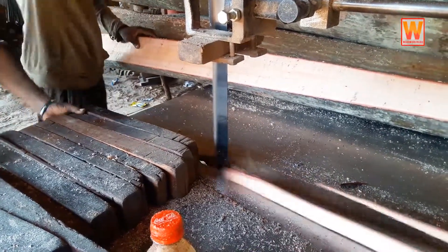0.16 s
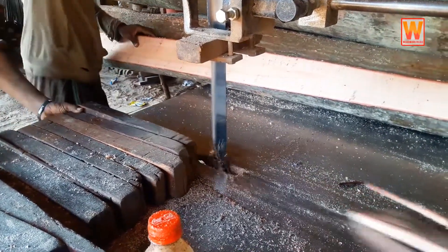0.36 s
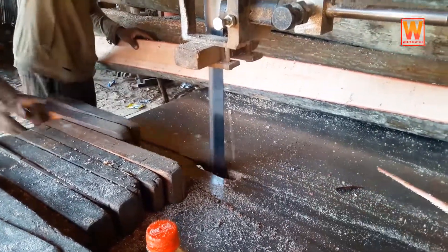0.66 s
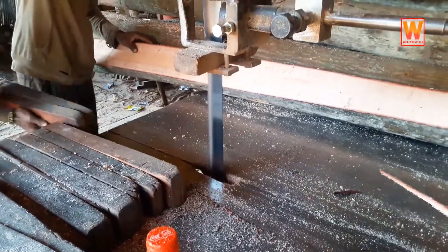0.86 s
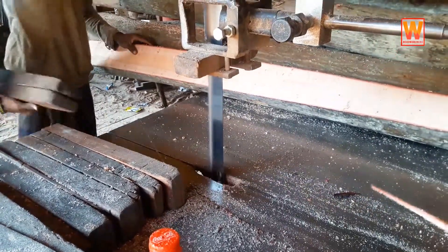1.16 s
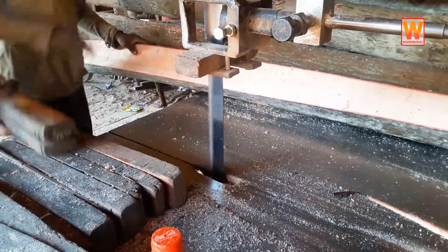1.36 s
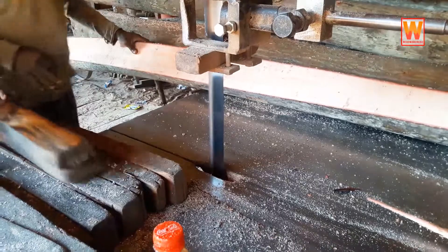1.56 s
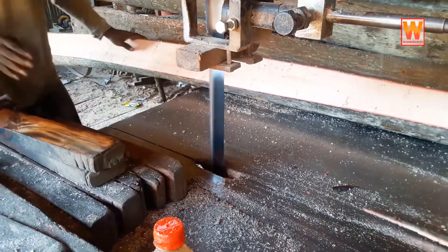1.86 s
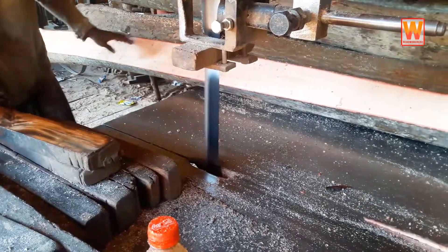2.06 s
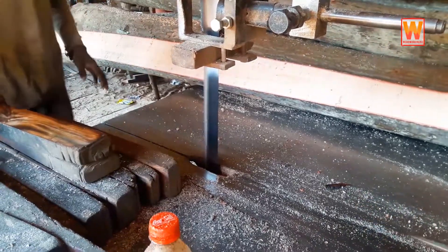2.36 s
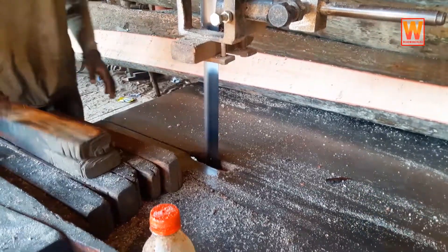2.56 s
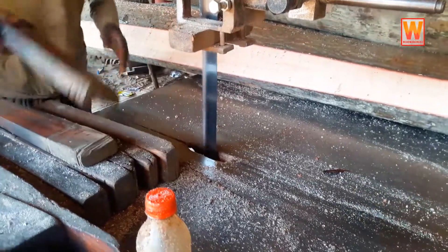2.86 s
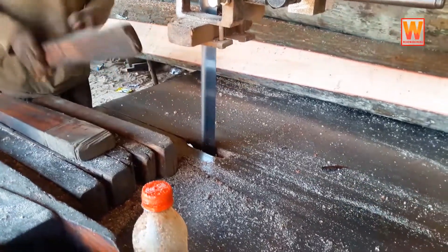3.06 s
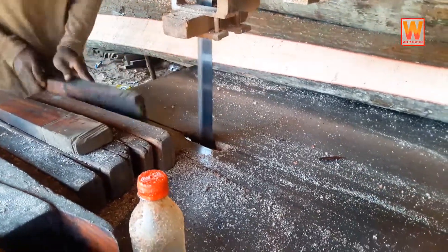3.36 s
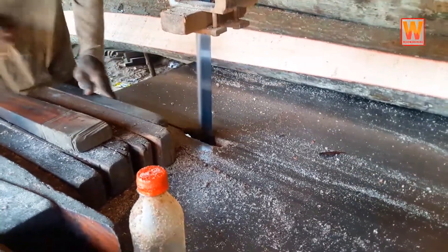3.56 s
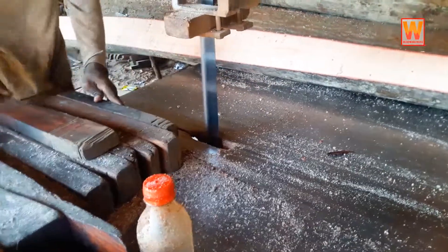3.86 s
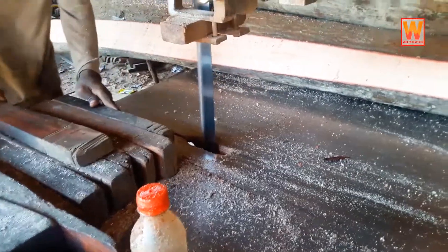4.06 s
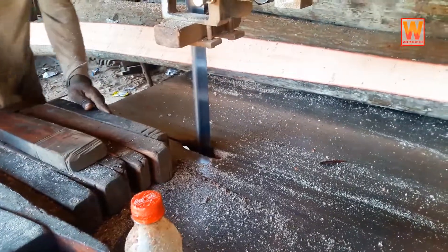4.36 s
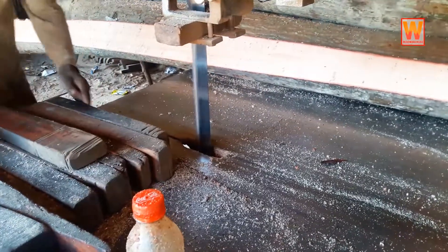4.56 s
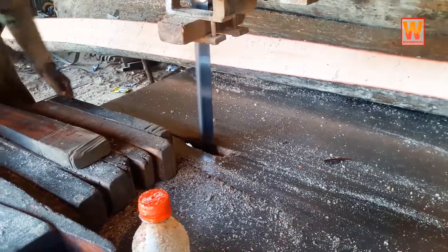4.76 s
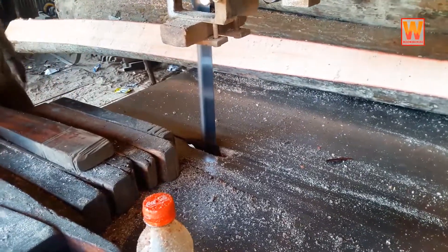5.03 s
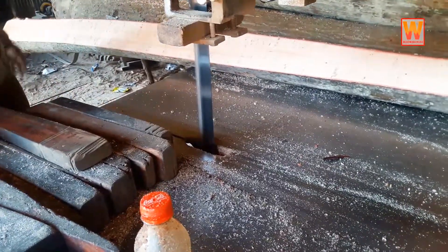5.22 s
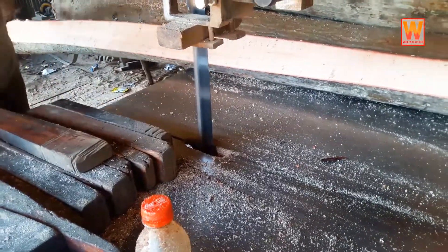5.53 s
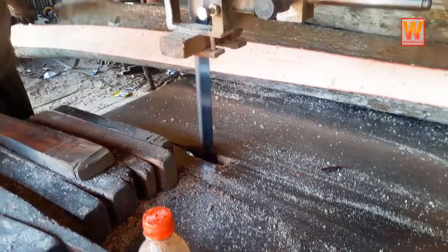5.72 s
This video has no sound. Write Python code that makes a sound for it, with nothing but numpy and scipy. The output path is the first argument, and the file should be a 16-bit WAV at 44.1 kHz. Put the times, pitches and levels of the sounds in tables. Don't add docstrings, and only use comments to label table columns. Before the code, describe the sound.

In an open sawmill shed, a large band saw leaves a cut with a fifth of a second of squeal and rasp, then runs free with steady bright hiss, thin whistles and metallic ringing. Halfway through, a plank smacks the steel table, rattles and bounces twice, with a low boom. The saw continues to the end, motor hum growing slightly. Stereo microphones a few metres away.

```python
import sys
import numpy as np
from scipy import signal
from scipy.fft import rfft, irfft, next_fast_len
from scipy.io import wavfile
from scipy.ndimage import uniform_filter1d

SR = 44100
rng = np.random.default_rng(int(sys.argv[2]) if len(sys.argv) > 2 else 0)


def transcribe(u):
    v = np.clip(np.atleast_2d(u).T, -1, 1)
    q = np.round(v * 32767).astype(np.int16)
    wavfile.write(sys.argv[1], SR, q)


def magnitude_from_level(level_db):
    exponent = np.asarray(level_db, float) / 20
    return 10 ** exponent


N = 259749
TIME = np.arange(N) / SR
SIZE = next_fast_len(N)
BINS_HZ = np.maximum(np.arange(SIZE // 2 + 1) * SR / SIZE, 1)


def in_time(rows):
    s, *columns = np.transpose(rows)
    return [np.interp(TIME, s, c) for c in columns]


def at_hz(points, hz):
    point_hz, db = np.transpose(points)
    return np.interp(np.log(hz), np.log(point_hz), db)


def rms_one(x):
    return x / np.sqrt(np.mean(x ** 2) + 1e-20)


def drift(rate):
    r = np.exp(-80 * np.pi * rate / SR)
    slow = signal.lfilter([1], [1, -2 * r, r * r], rng.standard_normal(N // 40 + 2002))[2000:]
    return np.interp(np.arange(N) / 40, np.arange(len(slow)), rms_one(slow))


def heard_between(start, end):
    return np.clip(np.minimum(TIME - start, end - TIME) / .3, 0, 1)


def swells(start, length, db):
    share = .35
    place = (TIME[:SR // 2] - start[:, None]) / length[:, None]
    shape = np.sin(np.pi / 2 * np.clip(np.minimum(place, 1 - place) / share, 0, 1)) ** 2
    return np.pad(magnitude_from_level(db) @ shape, (0, N - SR // 2))


# f/Hz, likeness [1 = same]
LIKENESS = [(60, .8), (120, 1), (240, 1), (480, 0.8), (950, 0.66), (1890, 0.22), (3770, 0.46), (6000, 0.2),
            (9000, 0.28), (15000, 0.19)]
# f/Hz, left minus right/dB
LEAN = [(60, 0.0), (110, 4), (200, -4), (380, 0.5), (700, -1), (1290, 2.5), (2380, -2.5), (4400, -3.0),
        (8120, -2.5), (15000, 3)]
# f/Hz, left lead/radians
LEAD = [(0, -0.5), (1210, 0.4), (2070, -0.72), (3270, 1.0), (4220, 1), (4570, 1.15), (5430, 1.4),
        (6370, 0.5), (6720, 0.9), (8180, 2.5), (11600, 4), (13500, 1), (15300, 5), (16500, 3.2)]


def noise(spectrum, shared_db, patchy_db, count, rings=1):
    low, high = spectrum[0][0], spectrum[-1][0]
    colour = magnitude_from_level(at_hz(spectrum, BINS_HZ)) * np.sqrt(rings) * (BINS_HZ > low) * (BINS_HZ < high)
    mid, side = rfft(rng.standard_normal((2, SIZE))) * colour
    alike = np.clip(at_hz(LIKENESS, BINS_HZ), -1, 1)
    lead = np.interp(BINS_HZ, *np.transpose(LEAD))
    lean = magnitude_from_level(at_hz(LEAN, BINS_HZ) / 2) * np.exp(.5j * lead)
    pair = np.sqrt(1 + alike) * mid + np.sqrt(1 - alike) * side * [[1], [-1]]
    pair = pair * [lean, 1 / lean]
    place = np.log(BINS_HZ / low) / np.log(high / low) * (count - 1)
    out = 0
    for k in range(count):
        band = irfft(pair * np.clip(1 - abs(place - k), 0, 1), SIZE)[:, :N]
        out = out + band * magnitude_from_level(shared_db + patchy_db * drift(7.0))
    return rms_one(out)


# t/s, level/dB over the blade hiss
HUM = [(0.0, -40), (1.7, -47), (2.0, -41), (3.9, -31.5), (5.89, -31)]
# f/Hz, level/dB over hiss, from t/s, to t/s
HOUSING = [(341, -34, .3, 2.3), (390, -33, .9, 3.2), (424, -30, -.3, .7)]
# f/Hz, level/dB per Hz
RUMBLE = [(110, -22), (135, -4.5), (155, -1.5), (180, -3.5), (205, -8), (255, -6.5), (300, -6.5), (341, -1),
          (365, -13.5), (390, 0.5), (450, -1), (520, 1.5), (600, -12)]
# f/Hz, level/dB per Hz
DEEP = [(15, -24), (30, -18), (50, -15), (65, -10), (85, -3), (105, 3), (125, 0), (150, -16)]


def motor(hiss_db):
    hum_hz, octave_db, waver_db, rumble_db, deep_db = 130, -7, 1, -25.5, -45.5
    hum_db, = in_time(HUM)
    turn = 2 * np.pi * np.cumsum(hum_hz + .5 * drift(3.4)) / SR
    hum = np.sqrt(2) * (np.sin(turn) + magnitude_from_level(octave_db) * np.sin(2 * turn))
    hum = magnitude_from_level(hum_db + waver_db * drift(2.3)) * hum
    lines = 0
    for hz, db, start, end in HOUSING:
        level = magnitude_from_level(db + 1.4 * drift(3.0)) * heard_between(start, end)
        lines = lines + level * np.sin(2 * np.pi * np.cumsum(hz + drift(2.8)) / SR)
    rumble = magnitude_from_level(rumble_db) * noise(RUMBLE, 0, patchy_db=2.8, count=3)
    deep = magnitude_from_level(deep_db + 0.96 * TIME) * noise(DEEP, 0, patchy_db=5, count=2)
    return magnitude_from_level(hiss_db) * (hum + lines + rumble + deep)


# t/s, f/Hz, peak level/dB, t60/s
BOOM = [
    (3.325, 103, -34, 0.25),
    (3.31, 226, -32, 0.21),
    (3.31, 270, -24, 0.12),
]


def table_boom():
    out = np.zeros(N)
    for s, hz, db, t60 in BOOM:
        age = np.clip(TIME - s, 0, None)
        out += magnitude_from_level(db - 60 * age / t60) * (1 - np.exp(-age / 0.0046)) * np.sin(2 * np.pi * hz * age)
    return out


# t/s, peak level/dB, brightness/dB per octave
DROPS = [
    (3.3012, 2, 5.5),
    (3.307, -17, 4),
    (3.312, -0.5, 2),
    (3.321, -9, 3.5),
    (3.565, -8.5, 4),
    (3.724, -15, 8),
]
# f/Hz, level/dB, t60/s
PLANK = [(556, -3.5, 0.1), (633, 4, 0.1), (738, 8.5, 0.057), (886, -1, .05), (1053, 8, 0.03),
         (1292, 6, 0.035), (1530, 0.5, 0.037), (1740, -1, 0.039), (1900, 5.5, 0.022), (2085, -0.5, 0.037),
         (2330, 0.5, 0.03), (2550, -2.5, 0.027)]


def plank():
    touch_spread_db, crack_t60_s, walls_t60_s, walls_db = 1.5, .016, .37, -36
    s, peak_db, bright_db = np.transpose(DROPS)
    at, out = (s * SR).astype(int), np.zeros(N)
    chance = rng.normal(0, touch_spread_db, (len(DROPS), len(PLANK)))
    for k, (hz, db, t60) in enumerate(PLANK):
        clicks = np.full(N, 1e-18)
        clicks[at] = magnitude_from_level(peak_db + db - 19.0 + bright_db * np.log2(hz / 700) + chance[:, k])
        r, w = magnitude_from_level(-60 / (t60 * SR)), 2 * np.pi * hz / SR
        out += (-1) ** k * signal.lfilter([0, np.sin(w)], [1, -2 * r * np.cos(w), r * r], clicks)
    crack = np.zeros(N)
    crack[at] = magnitude_from_level(peak_db - 13)
    burst = rng.standard_normal(900) * magnitude_from_level(-60 * np.arange(900) / SR / crack_t60_s)
    out += signal.sosfilt(signal.butter(3, 2700, fs=SR, output="sos"), np.convolve(crack, burst)[:N])
    out = signal.sosfilt(signal.butter(4, 430, "high", fs=SR, output="sos"), out)
    age = np.arange(SR // 3) / SR
    walls = rng.standard_normal((2, len(age))) * magnitude_from_level(-60 * age / walls_t60_s) * (age > .008)
    wash = signal.fftconvolve(out[None], walls, axes=1)[:, :N]
    return out * magnitude_from_level([[.6], [-.6]]) + magnitude_from_level(walls_db) * wash


# t/s, length/s, level/dB
SQUEALS = [
    [(-.01, .042, -20), (.035, .048, -24), (.1, .03, -18), (.118, .034, -24.5), (.163, .033, -20)],
    [(.022, .036, -18.5), (.066, .022, -23), (.16, .02, -24)],
    [(-.01, .038, -23), (.08, .025, -26), (.112, .032, -26)],
]
# t/s, length/s, level/dB
DRUMMING = [
    (-.01, .04, -33),
    (0.07, 0.028, -23.5),
]
# t/s, length/s, level/dB, f/Hz
CHIRPS = [
    (.066, .012, -20, 3870),
    (.188, .016, -20, 3620),
]
# t/s, length/s, rasp level/dB, table shake level/dB
BITES = [
    (-.03, .115, -17.5, -31),
    (.05, .095, -19, -34),
    (.16, .066, -18.5, -35),
]
# f/Hz, level/dB per Hz
RASP = [(450, -3), (600, -3.5), (2000, -11), (5000, -0.5), (9000, -7), (15500, -10)]


def cut_exit():
    tooth_hz, flutter_db = 1116, 1.2
    turn = 2 * np.pi * np.cumsum(tooth_hz + 3 * drift(43.0)) / SR
    squeal = 0
    for multiple, rows in enumerate(SQUEALS, 2):
        squeal = squeal + np.sqrt(2) * swells(*np.transpose(rows)) * np.sin(multiple * turn)
    squeal = squeal * magnitude_from_level(flutter_db * drift(40.0))
    squeal += swells(*np.transpose(DRUMMING)) * np.sin(turn / 2)
    for *swell, hz in CHIRPS:
        squeal += swells(*np.transpose([swell])) * np.sin(2 * np.pi * hz * TIME)
    start, length, rasp_db, shake_db = np.transpose(BITES)
    rasp = noise(RASP, 0, patchy_db=2.5, count=2)
    band = signal.butter(2, [75, 520], "band", fs=SR, output="sos")
    thuds = rng.standard_normal((2, N)) + 0.6 * rng.standard_normal(N)
    shake = rms_one(signal.sosfilt(band, thuds))
    wood = swells(start, length, rasp_db) * rasp + swells(start, length, shake_db) * shake
    return squeal * magnitude_from_level([[-1.5], [1.5]]) + wood


# f/Hz, level/dB over hiss, from t/s, to t/s
WHISTLES = [(3305, -21, 0, 6.2), (3395, -24, 0, 6.2), (3497, -19, 1.2, 3.4), (3520, -22, 4.9, 6.2),
            (3640, -22, 1.8, 4.6), (3790, -24, .9, 2.2), (3890, -20, 1.6, 2.9), (3915, -22, 4.7, 6.2),
            (3990, -22, 3.9, 6.2), (4500, -23, -.3, 1.0)]


def whistles():
    level_db, flicker_db, wander_hz = 1.5, 4.5, 16
    out = 0
    for hz, db, start, end in WHISTLES:
        turn = 2 * np.pi * np.cumsum(hz + wander_hz * drift(11.9)) / SR
        level = magnitude_from_level(db + flicker_db * drift(4.6)) * heard_between(start, end)
        out = out + level * np.sin(turn + [[.4], [-.4]])
    return magnitude_from_level(level_db + np.array([[-1.5], [1.5]])) * out


# f/Hz, width/Hz, level/dB over surroundings
RINGS = [(424, 12, 7), (495, 14, 5), (558, 13, 9), (697, 12, 8), (795, 10, 8), (905, 12, 8), (985, 14, 3),
         (1075, 20, 4), (1135, 14, 3), (1167, 12, 4), (1275, 13, 10), (1390, 30, 6), (1507, 20, 7),
         (1624, 24, 7), (1710, 20, 5), (1760, 16, 6), (1800, 20, 6), (1919, 17, 7), (2040, 20, 4),
         (2096, 20, 8), (2278, 18, 5), (2358, 20, 4), (3035, 20, 4), (3310, 40, 3), (3495, 40, 2),
         (3630, 30, 3), (3885, 40, 3), (3990, 40, 2), (4500, 40, 2), (5160, 40, 3)]


def ring_gain():
    depth = 1.15
    gain = 1
    for hz, width, db in RINGS:
        gain = gain + (magnitude_from_level(depth * db) ** 2 - 1) / (1 + (2 * (BINS_HZ - hz) / width) ** 2)
    return gain


# f/Hz, level/dB per Hz
BLADE = [(2300, -31.5), (3080, -20.5), (3290, -5), (3550, -4.5), (3620, -7.5), (3950, -7), (4080, -7),
         (4800, -8.5), (6000, -12), (7800, -17.5), (9000, -26.5)]
# f/Hz, level/dB per Hz
FRAME = [(400, -30), (520, -14), (900, -9), (1000, -9), (1150, -10), (1300, -10), (2000, -4), (2500, -4),
         (2750, -7), (3100, -7), (3600, -55)]
# f/Hz, level/dB per Hz
AIR = [(6500, -34), (7600, 3), (8200, -4.5), (8900, -4), (9800, -6.5), (10800, -5.5), (12000, -4.5),
       (13200, -7.5), (14500, -10.5), (15800, -10)]
# f/Hz, level/dB per Hz
GUARD = [(900, -27), (980, 2), (1075, 1.5), (1170, -1.5), (1230, -12), (1300, -4)]
# t/s, length/s, extra hiss level/dB
SLAPS = [
    (1.99, .06, 4),
    (2.05, .025, -2.5),
    (5.18, .07, 1.5),
]


def running_saw(hiss_db):
    wheel_hz, weld_hz = 11.1, 3.5
    frame_db, air_db, guard_db = -6, -11, -12.5
    turn_db_per_s, pan_db_per_s = 0.28, -0.2
    wheel = np.sin(2 * np.pi * wheel_hz * TIME + 1.76 * drift(0.87))
    weld = np.sin(2 * np.pi * weld_hz * TIME + 0.2)
    throb = 0.51 * wheel + 0.1 * weld + 0.62 * drift(13.5)
    for s, length, db in SLAPS:
        throb = throb + db * np.exp(-(2 * (TIME - s) / length - 1) ** 2)
    rings = ring_gain()
    blade = noise(BLADE, throb, patchy_db=0.03, count=5, rings=rings)
    frame = noise(FRAME, .5 * throb, patchy_db=0.8, count=7, rings=rings)
    air = noise(AIR, 1.03 * throb, patchy_db=0.5, count=3)
    guard = noise(GUARD, .5 * throb, patchy_db=0.5, count=2, rings=rings)
    machine = magnitude_from_level(frame_db) * frame + magnitude_from_level(air_db) * air + magnitude_from_level(guard_db + 0.19 * TIME) * guard
    saw = blade + whistles() + magnitude_from_level(turn_db_per_s * TIME) * machine
    return magnitude_from_level(hiss_db + pan_db_per_s * TIME * [[.5], [-.5]]) * saw


# t/s, blade hiss level/dB
GAIN = [(0.0, -16.5), (1.1, -17.5), (1.77, -15.5), (2.67, -14.5), (3.25, -15.5), (3.36, -18), (4.46, -18.5),
        (5.03, -16), (5.89, -15.5)]


def scene():
    duck_db, ahead_s, release_s = -5.5, 0.019, 0.013
    age = TIME - DROPS[0][0] + ahead_s
    duck = duck_db * np.clip(age / 0.011, 0, 1) * np.exp(-np.clip(age - .035, 0, None) / release_s)
    hiss_db, = in_time(GAIN)
    steady_db = hiss_db + duck
    return motor(steady_db) + table_boom() + plank() + cut_exit() + running_saw(steady_db)


def band_limit(x):
    return signal.sosfilt(signal.butter(12, 15650, fs=SR, output="sos"), x)


def record(dry):
    peak = .93
    low = signal.butter(2, 45, "high", fs=SR, output="sos")
    top = signal.ellip(12, .3, 80, 15630, fs=SR, output="sos")
    heard = signal.sosfilt(np.vstack([low, top]), peak * np.tanh(dry / peak))
    bass = signal.butter(4, 360, fs=SR, output="sos")
    side_bass = signal.sosfiltfilt(bass, (heard[0] - heard[1]) / 2)
    mono_spells = uniform_filter1d(1. * (drift(9.0) < 0) * (TIME > .25), size=1024)
    return band_limit(heard - mono_spells * side_bass * [[1], [-1]])


dry = scene()
out = record(dry)
transcribe(out)
```